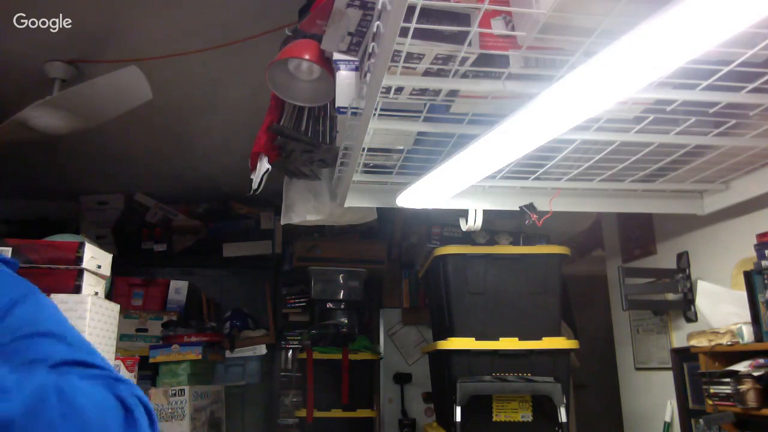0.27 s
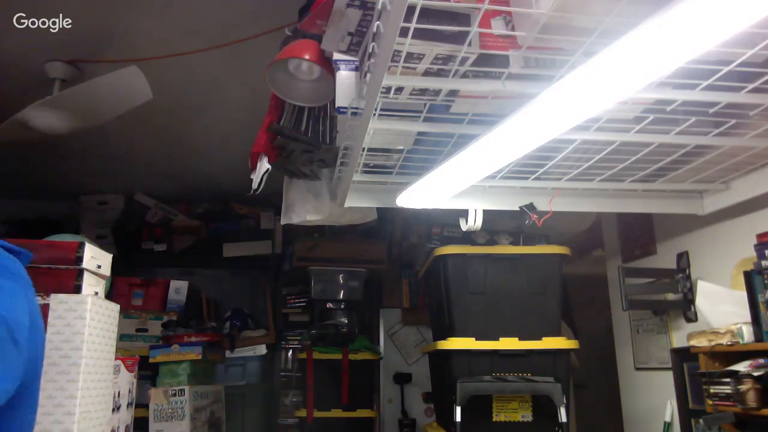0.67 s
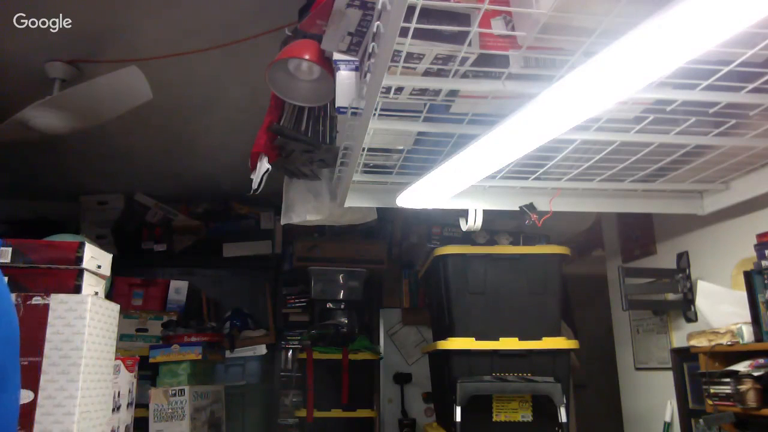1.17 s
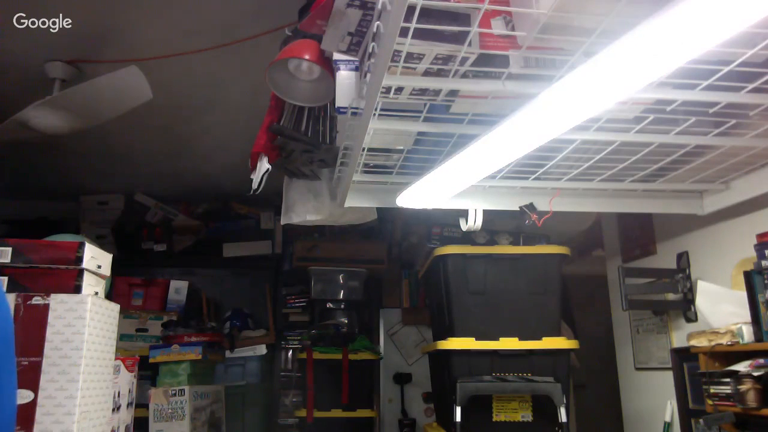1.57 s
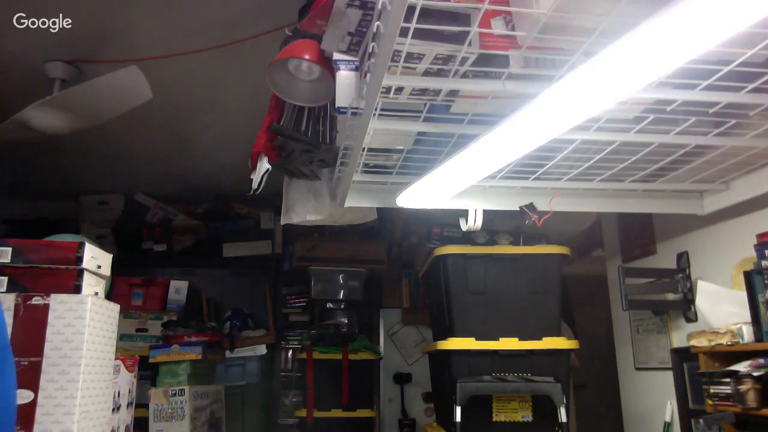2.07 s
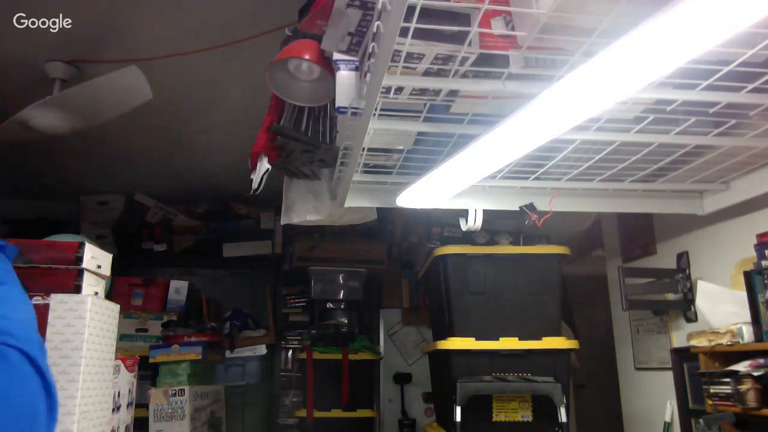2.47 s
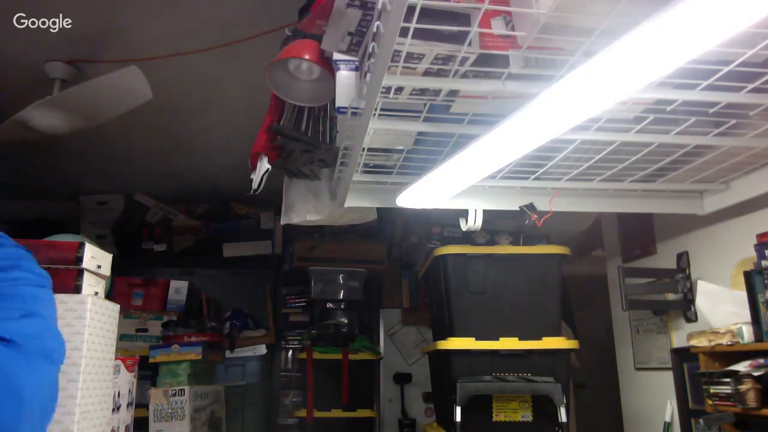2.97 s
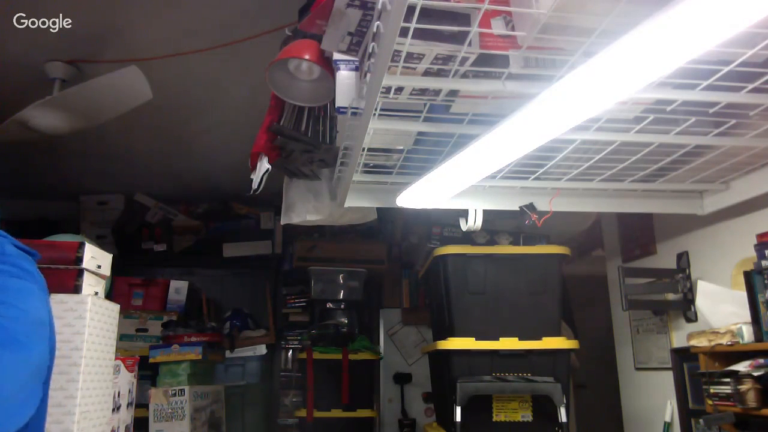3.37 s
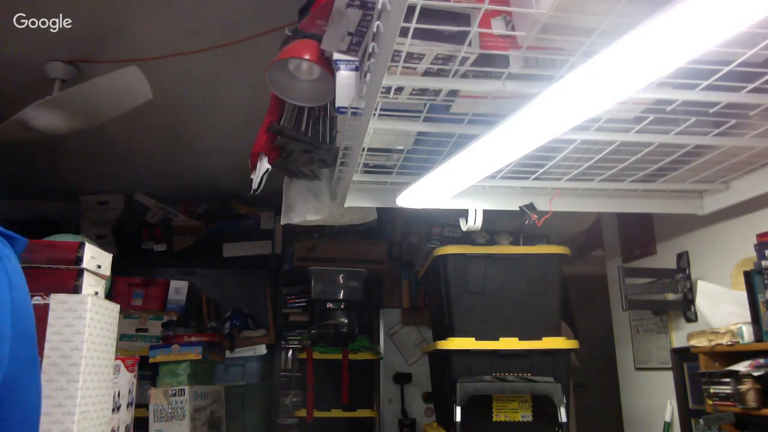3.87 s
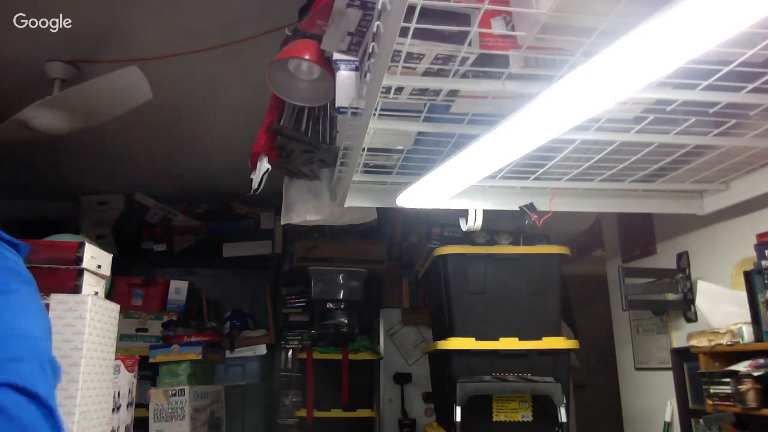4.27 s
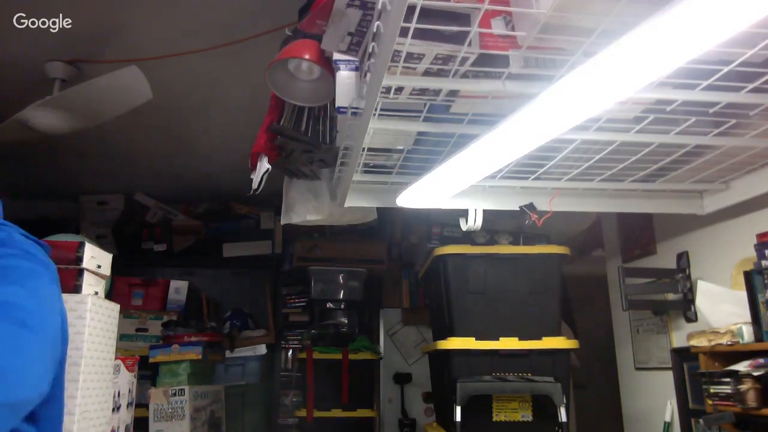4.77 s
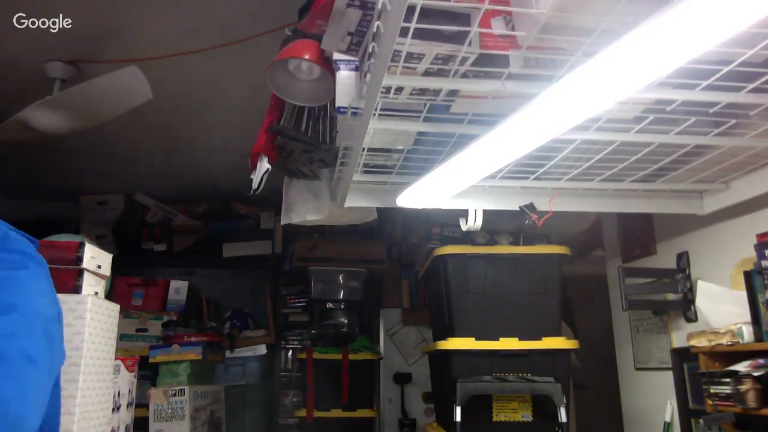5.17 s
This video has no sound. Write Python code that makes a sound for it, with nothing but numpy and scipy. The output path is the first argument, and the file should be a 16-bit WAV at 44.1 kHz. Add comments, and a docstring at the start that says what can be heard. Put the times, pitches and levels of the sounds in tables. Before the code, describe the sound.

Close, dense crackling of stiff paper pushed into a carton, with sharp snaps, scrapes, small squeaks and a late cluster of hollow knocks.

```python
"""In a cluttered storeroom, packing paper is crumpled into a cardboard box, handful after handful.
Each stroke takes hold, squeezes and lets go: random clicks ring as dense crackles, with a few loud snaps.
Firmer strokes drag more on the wall and shove the box more; filtered noise makes the squeaks.
Late on, the cardboard judders through its wall resonances, and the hardest bumps ring the box hollowly.
Short changing echoes surround the paper and box; both ears hear the same close microphone."""
import sys
import numpy as np
from scipy import signal
from scipy.io import wavfile
from scipy.ndimage import uniform_filter1d

SR = 44100
rng = np.random.default_rng(int(sys.argv[2]) if len(sys.argv) > 2 else 0)


def to_wav(s):
    """Save 16-bit WAV."""
    ch = np.atleast_2d(s).T  # columns
    pcm = np.round(np.clip(ch, -1, 1) * 32767)  # PCM
    wavfile.write(sys.argv[1], SR, pcm.astype(np.int16))


N = 239414
TIME = np.arange(N) / SR

# Tone colour of buckling paper. Each row: frequency in Hz, relative strength in dB.
CRACKLE_SPECTRUM = [(300, -25.5), (700, 2.5), (1200, 3), (1900, 3), (3000, 1.5), (5000, -2), (6500, -5),
                    (7700, -9.5), (9300, -2), (11500, -5.5), (13000, -11), (15000, -25.5), (16000, -5)]


def amp(db):
    """Turns decibels into a gain."""
    return 10 ** (np.asarray(db) / 20)


def unit(x):
    """Scales a sound to an average (rms) strength of 1."""
    return x / np.sqrt(np.mean(x ** 2) + 1e-20)


def read(points, hz):
    """Reads a curve between its points, along a logarithmic frequency axis."""
    frequency, value = np.transpose(points)
    return np.interp(np.log(hz + 1), np.log(frequency + 1), value)


def add(mix, s, sound):
    """Mixes a sound in at time s, in seconds."""
    part = mix[max(round(s * SR), 0):][:len(sound)]
    part += sound[:len(part)]


def colour(x, points, size=4096):
    """Gives a sound a spectrum without any ringing ahead of it, so clicks keep their sharp front."""
    hz = abs(np.fft.fftfreq(size, 1 / SR))
    log_gain = np.log(amp(read(points, hz)))
    # The Hilbert transform finds the phase that puts the filter's energy first.
    response = np.exp(np.conj(signal.hilbert(log_gain)))
    taps = np.fft.ifft(response).real[:size // 2]
    return signal.oaconvolve(x, taps)[:len(x)]


def resonate(x, hz, width):
    """Rings at one pitch with gain 1 there; a narrower width in Hz rings longer."""
    r = np.exp(-np.pi * width / SR)
    forward = np.array([1, 0, -1]) * (1 - r * r) / 2
    feedback = [1, -2 * r * np.cos(2 * np.pi * hz / SR), r * r]
    return signal.lfilter(forward, feedback, x)


def clicks(per_s, spread_db):
    """Makes random buckles of either sign: many small, a few large."""
    size = amp(spread_db * np.minimum(rng.exponential(1, N), 4.5))
    sign = rng.choice([-1, 1], N)
    return size * sign * (rng.random(N) < per_s / SR)


def steady(x, size=1500):
    """Evens out the slow level to about 1 and keeps the fast grain; size is in samples."""
    power = uniform_filter1d(uniform_filter1d(x ** 2, size), size)
    return x / np.sqrt(abs(power) + 1e-4 * np.mean(x ** 2))


def room(x, wet_db, size=12288, count=8, move_s=.07):
    """Adds the short echo of box and shelves, whose paths change as the hands move the paper."""
    # Each row: frequency in Hz, seconds for the echo to fall by 60 dB.
    echo_fade = [(150, .28), (500, .14), (1400, .125), (3700, .115), (9700, .095), (16000, .075)]
    t, wet = np.arange(size) / SR, np.zeros(N)
    echoes = rng.standard_normal((count, size)) * (rng.random((count, size)) < 4000 / SR)
    echoes = echoes * (t > .001)  # no echo in the first millisecond
    hz, at, z = signal.stft(echoes, SR, nperseg=256)
    fade = amp(-60 * at / read(echo_fade, hz)[:, None])
    tails = signal.istft(z * fade, SR, nperseg=256)[1]
    # The sound passes smoothly from one echo pattern to the next, round and round.
    for k, tail in enumerate(tails):
        away = abs((TIME / move_s - k) % count - count / 2)
        share = np.cos(np.pi / 2 * np.minimum(away, 1))
        wet += signal.oaconvolve(x * share, tail / np.linalg.norm(tail))[:N]
    return (x + amp(wet_db) * wet) / np.sqrt(1 + amp(wet_db) ** 2)


def gesture(start, rise, hold, t60, db):
    """A move of the hands takes hold, keeps its force and lets the paper settle."""
    age = TIME - start
    settling = np.maximum(age - rise - hold, 0)
    return amp(db - 60 * settling / t60) * np.clip(age / rise, 0, 1)


def handling():
    """Turns hand moves into gains for crackle, crisp top, drag and push; overlaps add in power."""
    # Strokes of the hands on the paper. Each row: start, rise, hold and settling time (to fall by 60 dB)
    # in seconds, relative crackle level in dB, crisp top relative to that crackle in dB.
    stroke_rows = [(0, .001, .018, .34, -18, -17.5), (0.041, .061, .141, .42, -22.5, -27),
                   (.259, .037, .006, .22, -17.5, -20), (.423, .005, .006, .17, -19.5, -3),
                   (.474, .02, .11, .3, -36, -27), (.665, .012, .246, .32, -15, -3),
                   (0.939, .034, .071, .18, -22, -1), (1.086, .023, .02, .2, -29.5, -11),
                   (1.155, .003, .05, .2, -30, -2.5), (1.21, .034, .005, .14, -24.5, -5.5),
                   (1.295, .074, .144, .15, -16, -6), (1.551, .005, .054, .16, -33, -13),
                   (1.678, .008, .002, .08, -31.5, -6), (1.768, .011, .016, .16, -38.5, 12),
                   (1.803, .014, .265, .4, -16.5, -1.5), (2.146, .054, .014, .15, -20.5, -6.5),
                   (2.258, .014, .07, .25, -42.5, 1), (2.36, .006, .035, .15, -35, 0),
                   (2.486, .02, .002, .1, -24.5, 2.5), (2.552, .008, .055, .16, -34, -14),
                   (2.612, .039, .044, .16, -20, -8.5), (2.758, .006, .008, .2, -24, -7.5),
                   (2.775, .035, .575, .25, -16.5, -4), (3.427, .03, .134, .33, -20.5, -9),
                   (3.488, .017, .004, .14, -17, 4.5), (3.646, .005, .011, .35, -18.5, 1),
                   (3.688, .032, .076, .33, -15.5, -5), (3.892, .004, .017, .11, -29, 1),
                   (3.942, .035, .002, .13, -16.5, -5), (4.008, .061, .003, .42, -31.5, 1.5),
                   (4.228, .014, .003, .09, -29, 7.5), (4.283, .006, .002, .25, -35, -3),
                   (4.342, .014, .002, .105, -16.5, 1.5), (4.523, .014, .002, .15, -43.5, -3),
                   (4.638, .036, .079, .21, -20.5, -0.5), (4.702, .047, .004, .17, -17, -1.5),
                   (4.824, .01, .008, .18, -22, -5.5), (4.903, .034, .002, .38, -21.5, -4),
                   (4.986, .014, .013, .21, -20.5, 0), (5.065, .028, .02, .35, -32, -33),
                   (5.294, .041, .004, .16, -43, 3.5), (5.39, .036, .01, .2, -27.5, -0.5)]
    # The wad slides along a wall. Each row: start, rise, hold and settling time (to fall by 60 dB)
    # in seconds, relative level in dB.
    rub_rows = [(0.078, 0.0084, 0.051, 0.23, -42), (0.903, 0.023, 0.087, 0.56, -21.5),
                (1.154, 0.048, 0.061, .11, -23), (1.29, 0.019, .22, 0.27, -20),
                (1.856, 0.026, 0.26, 0.54, -22), (2.256, 0.0066, 0.022, .45, -41.5),
                (3.753, .04, 0.064, 0.29, -18.5), (3.938, .012, .15, 0.27, -25),
                (4.192, .003, 0.036, 0.38, -25.5)]
    # The wad is pressed against the bottom of the box. Each row: start, rise, hold and settling time
    # (to fall by 60 dB) in seconds, relative level in dB.
    shove_rows = [(.27, .02, .015, 0.25, -26.5), (0.653, 0.0098, 0.05, 0.24, -22),
                  (0.892, 0.028, 0.11, 0.31, -23), (1.17, 0.013, 0.013, 0.19, -23),
                  (1.822, 0.033, 0.0083, 0.14, -23), (2.938, 0.024, 0.028, .3, -20.5),
                  (3.744, 0.019, 0.059, 0.49, -25), (3.916, .03, 0.18, 0.23, -32),
                  (4.18, .008, 0.063, .25, -30), (4.328, 0.01, 0.0091, 0.16, -41),
                  (4.508, 0.018, 0.0044, .15, -57), (4.712, 0.038, .005, 0.31, -22.5),
                  (4.816, 0.0088, 0.15, 0.14, -36.5), (4.987, 0.01, 0.0074, .15, -25.5)]
    wall_share_db, box_share_db = -8.5, -9  # how much of a firm stroke drags on the wall and shoves the box
    firm_db = -14  # a stroke lighter than this passes less of its force on
    wall_reach, box_reach = 0.16, 0.45  # dB lost from each share per dB below a firm stroke
    slack_drag = 0.21  # dull, slack paper lies against the wall: dB more drag per dB less crisp top
    uneven_db, uneven_s = 0.79, .025  # typical depth and spacing of the lumps as the wad gives way

    knots = np.arange(0, TIME[-1] + uneven_s, uneven_s)
    lumps = rng.standard_normal(N)[:len(knots)]
    uneven = amp(uneven_db * np.interp(TIME, knots, lumps))
    strokes = np.array([gesture(*row[:-1]) for row in stroke_rows]) * uneven
    crisp_db = np.array([row[-1:] for row in stroke_rows])

    force = np.linalg.norm(strokes, axis=0)
    crisp = np.linalg.norm(strokes * amp(crisp_db), axis=0)
    slack = np.linalg.norm(strokes * amp(-slack_drag * crisp_db), axis=0)
    firmness = np.minimum(force / amp(firm_db), 1)

    stroke_drag = amp(wall_share_db) * firmness ** wall_reach * slack
    drag = np.linalg.norm([stroke_drag] + [gesture(*row) for row in rub_rows], axis=0)
    stroke_push = amp(box_share_db) * firmness ** box_reach * force
    push = np.linalg.norm([stroke_push] + [gesture(*row) for row in shove_rows], axis=0)
    return force, crisp, drag, push


def creases(force, squeeze, crowding=.8, run_s=0.0091, buckles_per_s=750, spread_db=6.5,
            crushed_q=8, loose_q=16, tick_db=-5, count=5000, size=1800):
    """Each crease travels as a short run of buckles; loose facets ring, crushed ones tick."""
    out, t = np.zeros(N), np.arange(size) / SR
    # A hard squeeze folds a crowd of creases, a light touch single ones.
    folded = np.cumsum(force ** crowding)
    for when, facet, strength, reach in rng.random((count, 4)):
        at = np.searchsorted(folded, when * folded[-1])
        hz = 900 * (14000 / 900) ** np.sqrt(facet)  # 900 to 14000 Hz, more often high
        q = loose_q + (crushed_q - loose_q) * squeeze[at]  # higher q rings longer
        buckles = rng.standard_normal(size) * (rng.random(size) < buckles_per_s / SR)
        run = buckles * np.exp(-t / (run_s * (.5 + reach)))
        run[0] = 1
        size_db = spread_db * min(-np.log(1 - strength), 3)
        ringing = resonate(run, hz, hz / q) * np.sqrt(q)
        tick = amp(tick_db) * squeeze[at] * run
        add(out, at / SR, amp(size_db) * (ringing + tick))
    return out


def crumple(force, crisp, soft_db=0, crisp_db=-2.67, pops_db=-8, crush_db=-18):
    """Creases follow the force of the hands; a hard squeeze adds dry pops, taut paper a crisp top."""
    squeeze = np.minimum(force / amp(crush_db), 1) ** .5
    pops = amp(pops_db) * squeeze * unit(clicks(per_s=600, spread_db=5.6))
    grains = steady(creases(force, squeeze)) + pops
    paper = room(colour(grains, CRACKLE_SPECTRUM), wet_db=-1.5)
    # Split at 7400 Hz, so that the crisp top can follow its own gain.
    soft = signal.sosfilt(signal.butter(4, 7400, "low", fs=SR, output="sos"), paper)
    top = signal.sosfilt(signal.butter(4, 7400, "high", fs=SR, output="sos"), paper)
    soft_part = amp(soft_db) * force * steady(soft, size=700)
    crisp_part = amp(crisp_db) * crisp * steady(top, size=700)
    return soft_part + crisp_part


def wall(x):
    """The cardboard wall answers a rub with its resonances, in alternating sign."""
    # Each row: frequency in Hz, width in Hz, relative level in dB.
    resonances = [(436, 52, -6), (737, 48, -1), (904, 118, -1.5), (1150.4, 53, 3.5), (1587, 90, -6.5)]
    return sum((-1) ** k * amp(db) * resonate(x, hz, width) for k, (hz, width, db) in enumerate(resonances))


def scraping(drag, drag_db=-3, slip_db=34, top_hz=2000):
    """Paper catches and slips finely on the wall, with a few hard judders of the cardboard."""
    # Cardboard catching and slipping. Each row: start in seconds, relative level in dB.
    slip_rows = [(3.945, -11), (3.957, -7), (3.971, -10), (4.065, -9.5), (4.196, -7), (4.222, -12),
                 (4.235, -13), (4.281, -29), (5.096, -11.5), (5.113, -12.5), (5.124, -15)]
    slips = np.zeros(N)
    for s, db in slip_rows:
        add(slips, s, amp([db + slip_db]))
    damping = signal.butter(2, top_hz, fs=SR, output="sos")
    rubbing = signal.sosfilt(damping, wall(clicks(per_s=1100, spread_db=2.5)))
    fine = steady(room(rubbing, wet_db=-9.5))
    judders = room(signal.sosfilt(damping, wall(slips)), wet_db=-1.5)
    return amp(drag_db) * drag * fine + judders


def hollow(push, level_db=-2.0):
    """The wad shoves the box in many soft little blows."""
    # Tone colour of the shoved box. Each row: frequency in Hz, relative strength in dB.
    spectrum = [(25, -27), (60, -34), (90, -16.5), (130, -15.5), (180, -6), (215, -1.5), (280, 1.5),
                (340, -4.5), (440, 5), (535, -1.5), (620, -17), (900, -8.5), (1800, -47)]
    blows = colour(clicks(per_s=450, spread_db=2.5), spectrum)
    return amp(level_db) * push * steady(room(blows, wet_db=-3.0))


def air():
    """The faint hush of the storeroom is steady coloured noise."""
    # Each row: frequency in Hz, relative strength in dB.
    spectrum = [(25, -22), (150, -9.5), (300, -10), (600, -9.5), (1200, -6), (2500, -6), (5000, -16),
                (9000, -7.5), (14000, -27), (16000, -35)]
    return amp(-60) * unit(colour(rng.standard_normal(N), spectrum))


def squeaks(widest_hz=150, q=4):
    """Paper sliding on paper and cardboard squeaks or groans: noise rings in a narrow, fuzzy band."""
    # Each row: start in seconds, length in seconds, pitch in Hz, relative level in dB.
    squeak_rows = [(0.076, .09, 1147, -25), (0.136, 0.05, 1644, -26), (0.178, 0.057, 2220, -24),
                   (0.552, 0.028, 1440, -32.5), (.923, 0.061, 96, -39), (1.358, .18, 1070, -25),
                   (2.064, 0.042, 1385, -17.5), (2.254, 0.037, 1080, -35), (2.3, 0.082, 4800, -46),
                   (2.34, 0.085, 6440, -33.5), (2.55, .06, 3350, -35), (2.556, .05, 890, -42),
                   (2.734, .048, 3300, -29.5), (2.753, .025, 1340, -27.5), (3.94, .05, 1180, -21),
                   (3.947, .045, 4140, -24), (4.072, 0.096, 1080, -31.5), (4.194, .035, 1156, -22.5),
                   (4.266, 0.14, 3860, -39.5), (4.499, 0.063, 185, -46), (4.609, .12, 3140, -37.5),
                   (4.766, 0.087, 94, -42), (4.868, 0.038, 4150, -37), (5.317, 0.049, 4130, -40.5)]
    out = np.zeros(N)
    for s, length, hz, db in squeak_rows:
        rub, width = rng.standard_normal(SR), min(widest_hz, hz / q)
        ringing = resonate(resonate(rub, hz, width), hz, 2 * width)
        tone = ringing[-int(length * SR):]  # the end, where the ringing has settled
        add(out, s, amp(db) * unit(tone) * signal.windows.tukey(len(tone), .5))
    return room(out, wet_db=-13)


def snaps(level_db=-4, per_s=6000, ring_db=10, ring_q=3, size=2048):
    """A big crease gives way in an avalanche of small cracks that swells in a few milliseconds and dies."""
    # Loud single creases. Each row: start in seconds, relative peak level in dB, pitch in Hz.
    snap_rows = [(0.0975, -0.5, 2600), (0.2221, -3.5, 2130), (.2921, 0, 3160), (0.401, -18.5, 3810),
                 (.4235, -15, 4570), (.4674, -13, 4330), (.555, -13, 1470), (0.592, -12, 4700),
                 (0.659, -5.5, 5670), (0.6994, -2, 2530), (.8187, -15, 2640), (1.044, -14, 1390),
                 (1.2967, -10, 1470), (1.3288, -3.5, 2080), (1.6809, -19.5, 3620), (1.8118, -5, 6200),
                 (2.123, -6.5, 1490), (2.3615, -32, 6600), (2.649, 0.5, 2920), (2.761, -7.5, 3480),
                 (2.9394, 2.5, 1500), (3.608, -1, 4400), (3.649, -9.5, 4630), (4.611, -25, 4830),
                 (4.6445, -16, 4100), (4.7483, 0, 3330), (4.8996, -12.5, 1510), (5.181, -17.5, 5250)]
    swell_s = .0038  # a big crease builds up in this time
    out, age = np.zeros(N), np.arange(size) / SR / swell_s
    for s, db, hz in snap_rows:
        cracks = rng.choice([-1, 1], size) * (rng.random(size) < per_s / SR)
        run = age * np.exp(-age) * cracks
        ringing = amp(ring_db) * resonate(run, hz, hz / ring_q)
        crack = colour(run + ringing, CRACKLE_SPECTRUM)
        add(out, s, amp(db + level_db) * crack / abs(crack).max())
    return room(out, wet_db=0.5)


def bumps(level_db=0, lowest_hz=170, size=12000):
    """Blows ring the box; longer contact favours low tones, and the small panels radiate no deep bass."""
    # Bumps on the box. Each row: start in seconds, relative peak level in dB, contact time in seconds.
    bump_rows = [(.286, -22, 0.00034), (1.193, -11, .0027), (2.943, -15, 0.0014), (3.799, -17, 0.00046),
                 (4.183, -24, 0.0032), (4.746, -15.5, 0.0029), (5.1001, -6, 0.0003), (5.117, -1.5, 0.00019),
                 (5.1413, -.5, 0.00098), (5.153, -3, 0.00075), (5.164, -18, 0.0017), (5.399, -28.5, .0052)]
    # Ringing tones of the box. Each row: frequency in Hz, relative level in dB, seconds to fall by 60 dB.
    box_modes = [(150, -26, 0.092), (218, -5.5, 0.31), (289, 2.5, 0.13), (315, 11, 0.033),
                 (357, -19.5, 0.14), (444, 19, 0.04), (469.6, 14.5, 0.12), (509, -12, 0.16),
                 (557, -25, 0.22), (754, -2, 0.16), (874, -7, 0.074), (994, 10.5, 0.034), (1150, -17, .07),
                 (1560, -11, .05)]
    out, t = np.zeros(N), np.arange(size) / SR
    ring = sum(amp(db - 60 * t / t60) * np.sin(2 * np.pi * hz * t) for hz, db, t60 in box_modes)
    ring = signal.sosfilt(signal.butter(3, lowest_hz, "high", fs=SR, output="sos"), ring)
    for s, db, contact in bump_rows:
        pressure = np.sin(np.pi * np.minimum(t / contact, 1)) ** 2
        blow = signal.fftconvolve(ring, pressure)[:size]
        add(out, s, amp(db + level_db) * blow / abs(blow).max())
    return room(out, wet_db=-14.0)


def scene():
    """Adds paper, box and room at one microphone, the same for both ears."""
    force, crisp, drag, push = handling()
    paper = crumple(force, crisp) + snaps() + squeaks()
    box = scraping(drag) + hollow(push) + bumps()
    mono = paper + box + air()
    return np.array([mono, mono])


def record(dry):
    """Rounds off the highest peaks, then removes the treble above about 15800 Hz."""
    knee, edge_hz = .52, 15800  # the rounding starts at the knee (full scale is 1)
    held = np.clip(dry, -knee, knee)
    rounded = held + (1 - knee) / 2 * np.tanh(2 * (dry - held) / (1 - knee))
    taps = signal.firwin(511, edge_hz, window=("kaiser", 9), fs=SR)
    return signal.oaconvolve(rounded, taps[None], "same")


dry = scene()
out = record(dry)
to_wav(out)
```